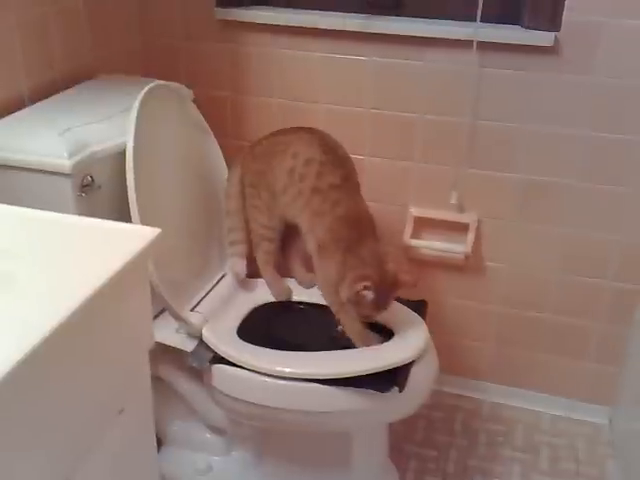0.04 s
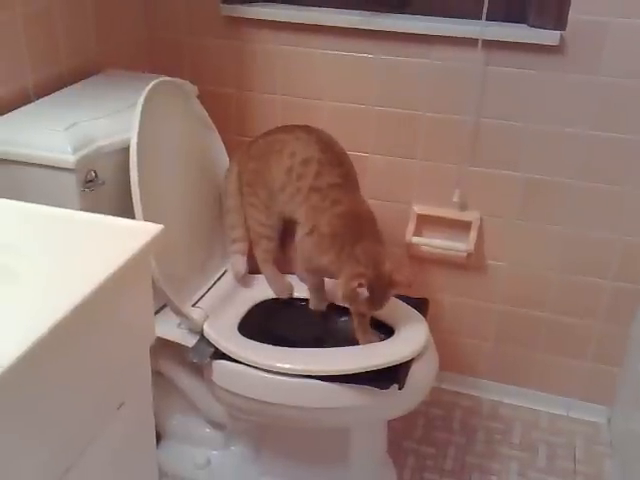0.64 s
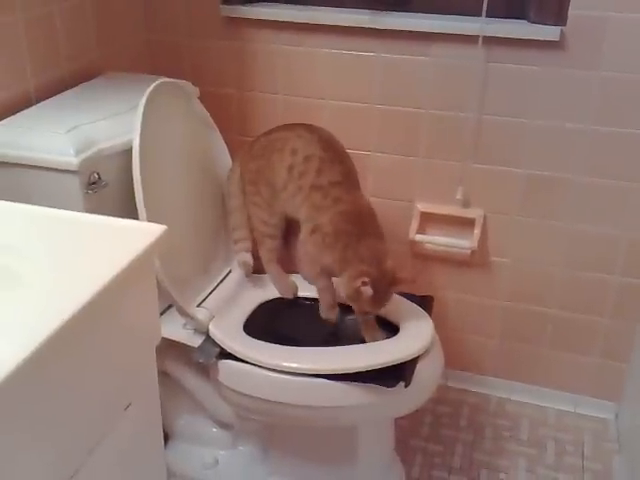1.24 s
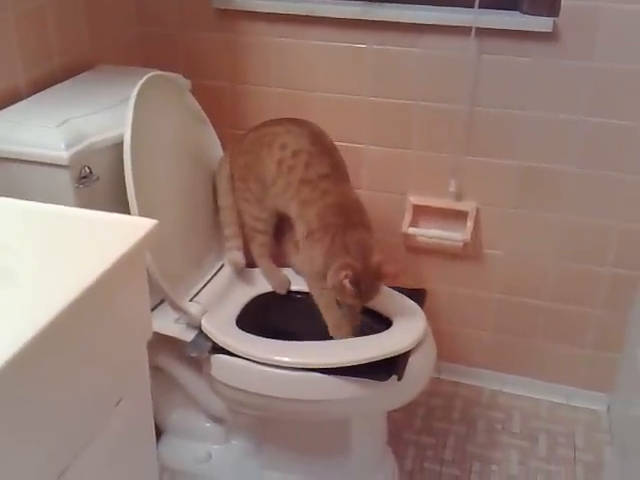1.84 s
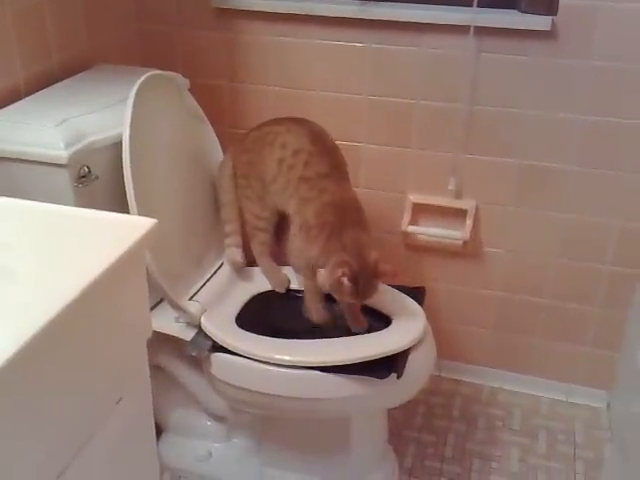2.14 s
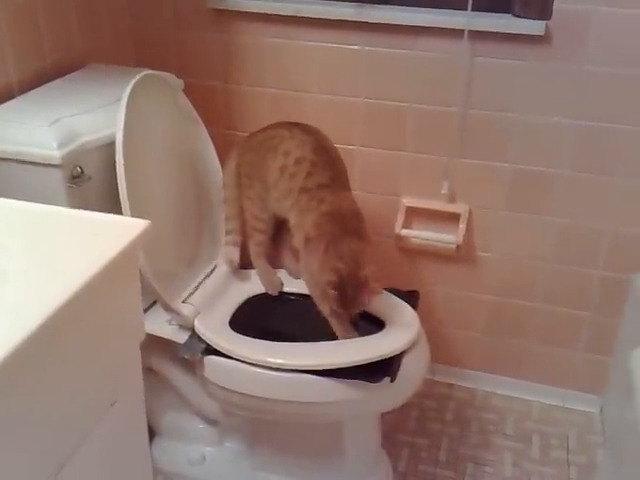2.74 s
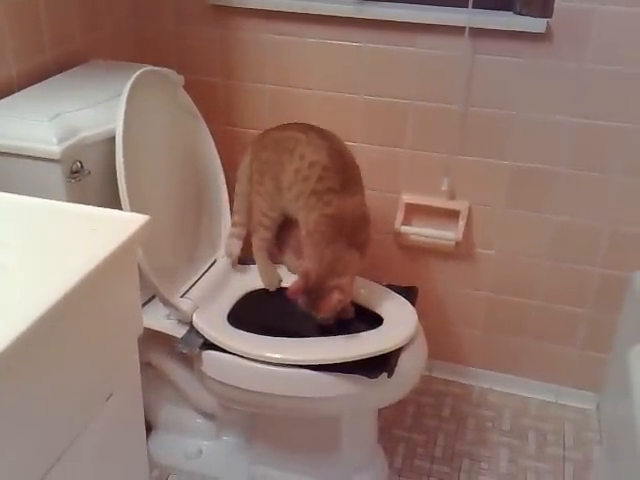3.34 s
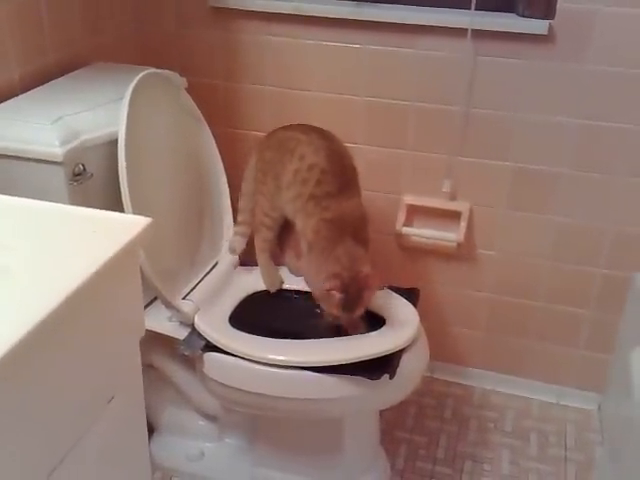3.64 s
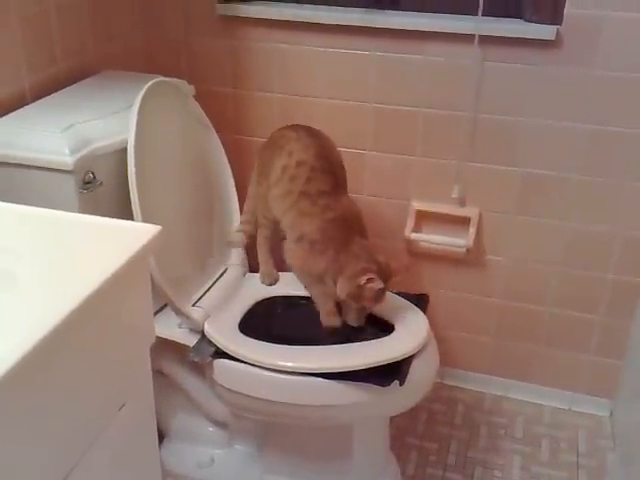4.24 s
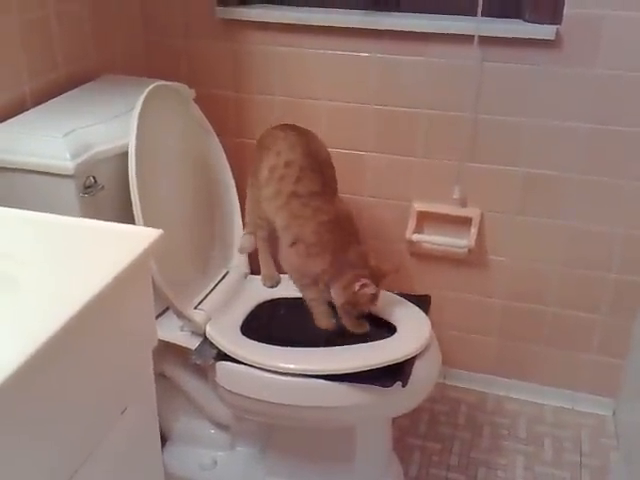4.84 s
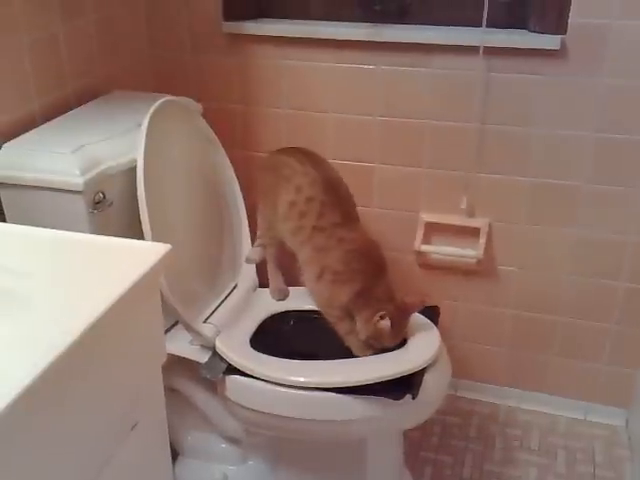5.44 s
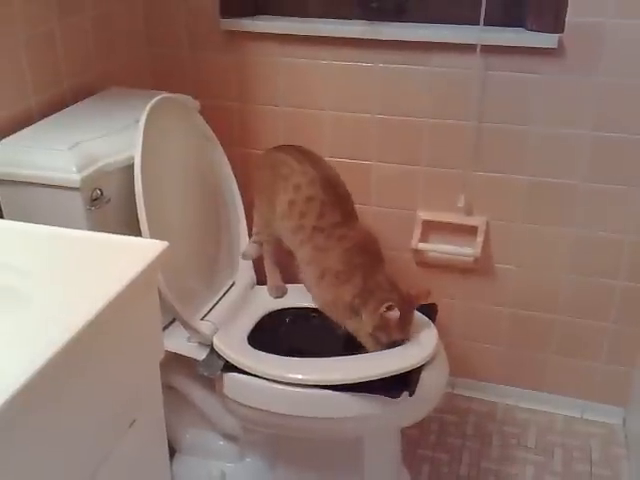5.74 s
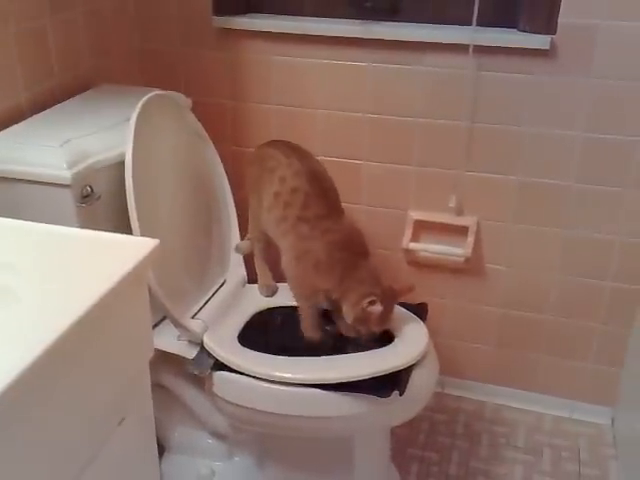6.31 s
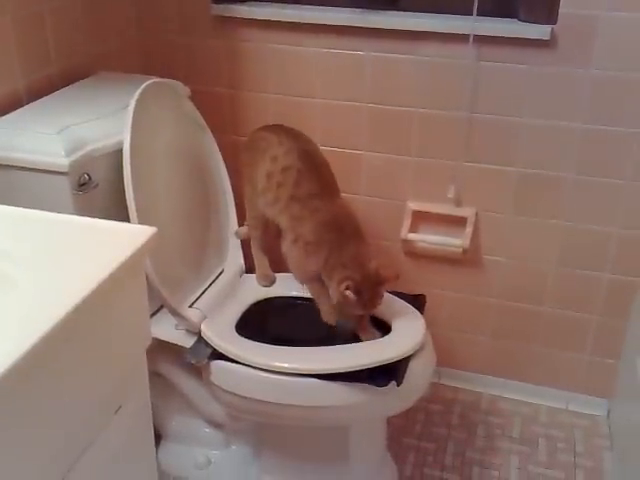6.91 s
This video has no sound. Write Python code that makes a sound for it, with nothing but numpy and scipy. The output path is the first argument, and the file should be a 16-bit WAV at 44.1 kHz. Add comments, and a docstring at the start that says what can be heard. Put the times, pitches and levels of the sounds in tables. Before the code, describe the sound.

A cat paws into a toilet bowl, knocking the loose plastic seat against the porcelain quickly, then only occasionally.

```python
"""Cat pawing into a toilet bowl

A cat on a loose plastic seat makes four quick strokes a second: each dabs into the hollow bowl,
then rocks the seat against the porcelain. Later it only shifts its weight now and then, with light
taps and brushes. The knocks boom in a small tiled bathroom over a steady hiss."""
import sys
import numpy as np
from scipy import signal
from scipy.fft import rfft, irfft, next_fast_len
from scipy.io import wavfile

SR = 44100
rng = np.random.default_rng(int(sys.argv[2]) if len(sys.argv) > 2 else 0)


def transcribe(signal):
    """Save signal, clipped to [-1, 1], as a 16-bit WAV file at the path in sys.argv[1]."""
    frames = np.atleast_2d(signal).T
    limited = np.clip(frames, -1, 1)
    pcm = np.round(limited * 32767).astype(np.int16)
    wavfile.write(sys.argv[1], SR, pcm)


N = 307377
RING = int(.9 * SR)   # samples given to one contact's tail
AGE = np.arange(RING) / SR
GRAZE_S = 0.012   # an edge grazes the rim this long before the seat lands

# spectrum of a knock's dense ringing: f/Hz, level/dB
KNOCK_SPECTRUM = [(50,-17),(110,-3),(200,4.5),(320,0.5),(480,-1.5),(1000,-3),(1400,-9),(2000,-12.5),(2700,-21),(3700,-23.5),(5500,-36),(8000,-42),(15000,-48.5)]
# pawing, a dab and then a hard knock: knock t/s, level/dB, softness/0-1, thump f/Hz, dab lead/s
PAW_STROKES = [(0.110,-34.5,0.11,220,0.028),(0.319,-37.5,0.14,188,0.039),(0.575,-34,.06,236,0.065),(0.792,-31,0.16,233,0.066),(1.035,-39,0.15,282,0.05),(1.296,-31.5,0.09,187,.064),(1.563,-33.5,0.05,232,.085),(1.819,-29,0,222,0.098)]


def from_db(db):
    """Decibels to gain."""
    return 10 ** (np.asarray(db) / 20)


def at_hz(points, hz):
    """Read a curve along log frequency."""
    freqs, values = np.transpose(points)
    return np.interp(np.log(hz + 0.00071), np.log(freqs), values)


def unit_onset(x):
    """Scale a sound to rms 1 over its first 40 ms."""
    head = x[:int(.04 * SR)]
    return x / np.sqrt(np.mean(head ** 2) + 1e-20)


def add(track, s, sound):
    """Mix a sound into the track from time s."""
    start = max(0, int(s * SR))
    track[start:start + len(sound)] += sound[:len(track) - start]


def band(x, band_hz, order):
    """Butterworth band-pass."""
    return signal.sosfilt(signal.butter(order, band_hz, "band", fs=SR, output="sos"), x)


def swell(x, rise_s):
    """A rounded attack, at unit onset level: the contact closes and the reflections pile up."""
    return unit_onset(x * (1 - np.exp(-AGE / rise_s)))


def noise(colour, size):
    """Noise of a given spectrum, rms 1."""
    gain = from_db(at_hz(colour, np.fft.rfftfreq(size, 1 / SR)))
    x = irfft(rfft(rng.standard_normal(size)) * gain, size)
    return x / x.std()


def background():
    """A bed of room rumble, microphone hiss and a faint whine that sets in low and swells."""
    # spectrum of rumble and hiss: f/Hz, level/dB
    bed_spectrum = [(15,-44),(26,0.5),(50,0.5),(95,-0.5),(150,-1),(220,-2),(370,-7.5),(550,-9.5),(800,-13.5),(1200,-17.5),(2700,-19.5),(4500,-21.5),(10000,-22.5),(14000,-21.5)]
    fade_start_s, fade_s, fade_depth_db, floor_db = 0.074, 0.52, 10.5, -44
    whine_hz, half_width_hz = 4510, 70
    risen = (np.arange(N) / SR - fade_start_s) / fade_s
    fade = (risen > 0) * from_db(-fade_depth_db * (1 - np.clip(risen, 0, 1)))
    whine = band(rng.standard_normal(N), [whine_hz - half_width_hz, whine_hz + half_width_hz], order=1)
    hiss = noise(bed_spectrum, next_fast_len(N))[:N]
    bed = from_db(-61) * hiss + from_db(-83.5) * whine / whine.std()
    return (fade + from_db(floor_db)) * bed


def room_ring(colour):
    """One contact heard through dense reflections: each half octave dies at the room's rate."""
    # reverb time of the tiled room: f/Hz, t60/s
    tile_decay = [(80,0.91),(220,0.68),(560,0.53),(1400,0.32),(3800,0.36),(10000,0.3)]
    spectrum, hz = rfft(noise(colour, RING)), np.fft.rfftfreq(RING, 1 / SR)
    edges_hz = np.geomspace(30, 17000, 19)
    out = 0
    for low, high in zip(edges_hz, edges_hz[1:]):
        half_octave = irfft(spectrum * ((hz >= low) & (hz < high)), RING)
        t60 = at_hz(tile_decay, np.sqrt(low * high))
        out = out + half_octave * from_db(-60 * AGE / t60)
    return unit_onset(out)


def paw_friction(length_s, per_s, catch_db):
    """A first touch, then uneven small catches while the paw moves."""
    caught = (rng.random(RING) < per_s / SR) & (AGE < length_s)
    catches = caught * rng.standard_normal(RING) * from_db(catch_db)
    catches[0] = 1
    return catches


def brushes():
    """A paw slides over the plastic in many tiny catches."""
    # paw slides: t/s, level/dB, length/s
    paw_slides = [(0.085,-54.5,0.0089),(2.284,-61,0.049),(2.661,-68,.02),(4.602,-59.5,0.0063),(6.051,-68.5,0.037),(6.398,-63.5,0.06),(6.92,-48.5,.02)]
    # spectrum of fur and pads on plastic: f/Hz, level/dB
    fur_spectrum = [(300,4),(1200,6),(2200,5),(3600,3),(4600,-0.5),(6000,-12),(15000,-24)]
    out = np.zeros(N)
    for s, db, length_s in paw_slides:
        catches = paw_friction(length_s, per_s=2300, catch_db=-19)
        swish = signal.fftconvolve(catches, room_ring(fur_spectrum))
        add(out, s, from_db(db) * unit_onset(swish))
    return out


def dab(length_s, bowl_hz, bowl_t60=0.078, bowl_db=-8, tick_db=6, tick_s=0.0016):
    """A paw dabs into the bowl: a short tick, then the hollow rings on while the paw moves."""
    # spectrum of the bowl's hollow: f/Hz, level/dB
    hollow_spectrum = [(100,1),(250,2),(450,2.5),(680,-1.5),(900,2),(1150,-1.5),(1450,-9.5),(1900,-13.5),(3000,-22.5),(8000,-37)]
    tone = np.sin(2 * np.pi * bowl_hz * AGE) * from_db(-60 * AGE / bowl_t60)
    bowl = from_db(bowl_db) * swell(tone, rise_s=0.0025)
    attack = 1 + from_db(tick_db) * np.exp(-AGE / tick_s)
    tick = swell(room_ring(hollow_spectrum) * attack, rise_s=0.0013)
    catches = paw_friction(length_s, per_s=540, catch_db=-11)
    drone = signal.fftconvolve(catches, bowl)[:RING]
    return unit_onset(tick + drone)


def paw_in_bowl():
    """A long dab leads each stroke; the lone taps are brief, each with a hollow pitch of its own."""
    # lone light taps in the bowl: t/s, level/dB, ring f/Hz
    lone_taps = [(1.658,-52.5,993),(2.001,-54,980),(2.118,-51.5,1004),(2.637,-63,700),(2.662,-59,950),(3.709,-65.5,956),(4.121,-63,970),(5.315,-64.5,945),(6.477,-55.5,655),(6.649,-56.5,710),(6.695,-51.5,990)]
    full_dab_db, full_lead_s = -44, 0.052
    out = np.zeros(N)
    for s, *_, lead_s in PAW_STROKES:
        gain = from_db(full_dab_db) * min(lead_s / full_lead_s, 1)   # hastier dabs are weaker
        add(out, s - lead_s, gain * dab(length_s=0.75 * lead_s, bowl_hz=690))
    for s, db, ring_hz in lone_taps:
        add(out, s, from_db(db) * dab(length_s=0.006, bowl_hz=ring_hz))
    return out


def seat_ring(spread_db, build_cycles):
    """A blow gives each mode its own strength and phase; standing waves take a few cycles to build."""
    # modes of seat and bowl, and the room's low standing waves: f/Hz, level/dB, t60/s
    seat_modes = [(45.4,-11,0.52),(93.25,-5.5,0.56),(138.3,-8,0.52),(178.8,-4.5,0.5),(195.7,-3,0.2),(220.2,-4,0.55),(285.2,-10.5,0.54),(301.7,-4.5,0.49),(345,-17,0.51),(372.7,-9,0.62),(385,-16.5,0.25),(519,-16.5,0.69),(545,-24,1),(636,-20,0.84),(641.5,-7.5,0.15),(709,-10,0.29),(943,-21,0.37),(1144,-15,0.28),(1182,-21,0.34),(1300,-19,0.25),(1760,-24.5,0.47),(1823,-27,0.44),(2044,-18,0.24)]
    hz, level_db, t60 = np.transpose(seat_modes)[:, :, None]
    strength_db = level_db + spread_db * rng.standard_normal(hz.shape)
    waves = np.sin(2 * np.pi * (hz * AGE + rng.random(hz.shape)))
    build = 1 - np.exp(-AGE * hz / build_cycles)
    decay = from_db(strength_db - 60 * AGE / t60)
    return unit_onset(np.sum(waves * build * decay, axis=0))


def knock(repeating_ring, softness, pitch_hz):
    """The seat meets the rim after GRAZE_S: weight gives the thump, a hard contact the clack."""
    graze_db, flex_s, bounce_s, bounce_db = -15, 0.00475, 0.015, -9
    # the contact point wanders, so only part of the ringing repeats
    ring = unit_onset(repeating_ring + 0.48 * room_ring(KNOCK_SPECTRUM))
    ring = ring + seat_ring(spread_db=3, build_cycles=1.5)
    # a cushioned contact dies faster and closes slowly, with little clack and a darker, weaker body
    ring = ring * from_db(-25 * softness * AGE)
    closing_s = 0.0011 + 0.007 * softness ** 2
    body_db, clack_db = -2.64 - 14 * softness, -4.5 - 31 * softness   # against the thump
    body_top_hz = max(1347 * 2 ** -softness, 600)
    # where the weight lands decides which low modes speak most
    favoured = band(ring, [pitch_hz / 1.15, pitch_hz * 1.15], order=1)
    lows = band(ring, [30, 450], order=2) + from_db(4) * favoured
    thump = swell(band(lows, [25, 500], order=2), rise_s=0.005)
    # an edge grazes the rim, the seat flexes under the weight, strikes and bounces on that edge
    edge = room_ring(KNOCK_SPECTRUM)
    out = np.zeros(2 * RING)
    add(out, 0, from_db(body_db + graze_db) * swell(edge, rise_s=0.00077))
    add(out, GRAZE_S - flex_s, thump)
    for s, db, contact in (GRAZE_S, 0, ring), (GRAZE_S + bounce_s, bounce_db, edge):
        body = swell(band(contact, [450, body_top_hz], order=3), closing_s)
        clack = swell(band(contact, [1400, 17000], order=3), closing_s)
        add(out, s, from_db(body_db + db) * body + from_db(clack_db + db) * clack)
    return out


def seat():
    """Every stroke and every shift of weight knocks the loose seat on the porcelain rim."""
    # shifts of weight, and at 0.191 s a rebound of the seat after the first stroke: t/s, level/dB,
    # softness/0-1, thump f/Hz
    weight_shifts = [(0.191,-39,.8,221),(0.547,-38.5,0.65,205),(2.262,-55,1,192),(2.313,-39.5,0.46,196),(2.947,-42,0.31,240),(3.187,-53.5,0.76,194),(4.541,-43,0.72,170),(4.907,-35.5,0.07,177),(5.662,-58.5,0.76,193),(6.31,-56,0.6,205),(6.475,-48,.8,265),(6.66,-50,0.86,126),(6.7,-58,0.8,193),(6.879,-58.5,1,219),(6.921,-40,0.07,285)]
    lean_lead_s, lean_db = 0.01797, -11.5
    out, repeating_ring = np.zeros(N), room_ring(KNOCK_SPECTRUM)
    for s, db, softness, pitch_hz, *_ in PAW_STROKES + weight_shifts:
        add(out, s - GRAZE_S, from_db(db) * knock(repeating_ring, softness, pitch_hz))
    # the cat leans into each stroke: a soft thump just before the seat lands
    for s, db, *_ in PAW_STROKES:
        lean = band(seat_ring(spread_db=2.5, build_cycles=1.6), [70, 420], order=2)
        add(out, s - lean_lead_s, from_db(db + lean_db) * unit_onset(lean))
    return out


def scene():
    """Knocks, dabs and brushes over the bed, in mono."""
    return (seat() + paw_in_bowl() + brushes() + background())[None]


def record(dry):
    """A steep low-pass takes off the very top."""
    cutoff_hz = 15750
    return signal.sosfilt(signal.ellip(16, .1, 80, cutoff_hz, fs=SR, output="sos"), dry)


dry = scene()
out = record(dry)
transcribe(out)
```